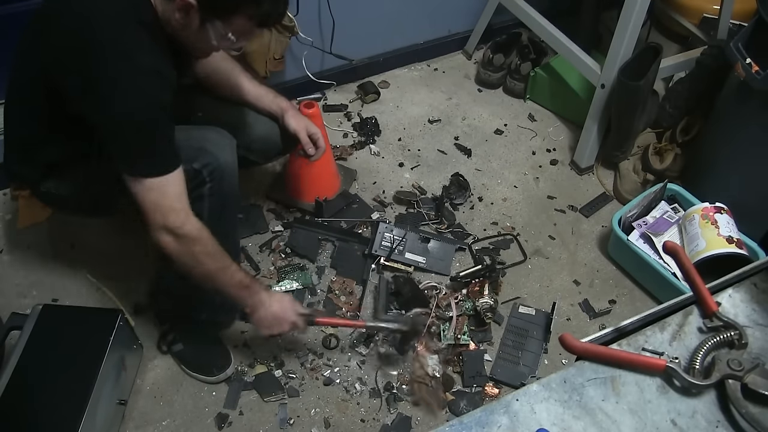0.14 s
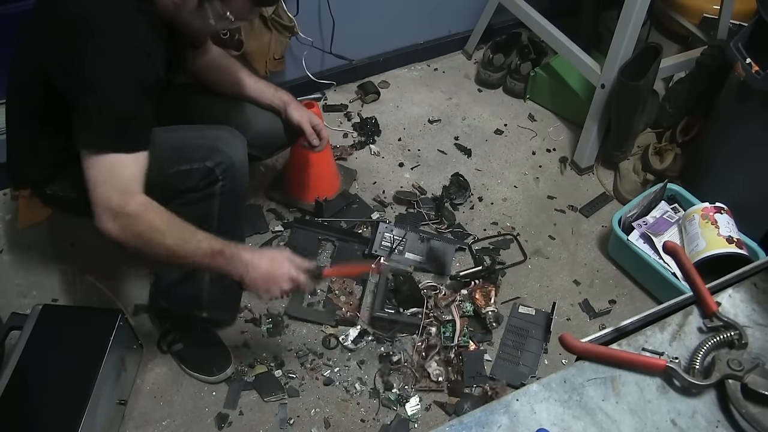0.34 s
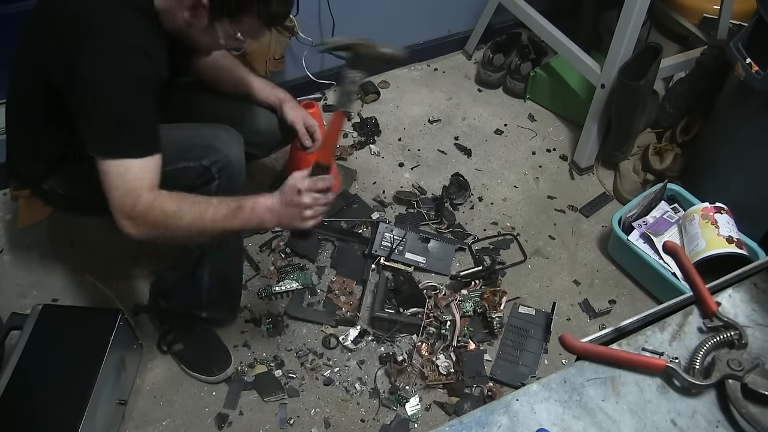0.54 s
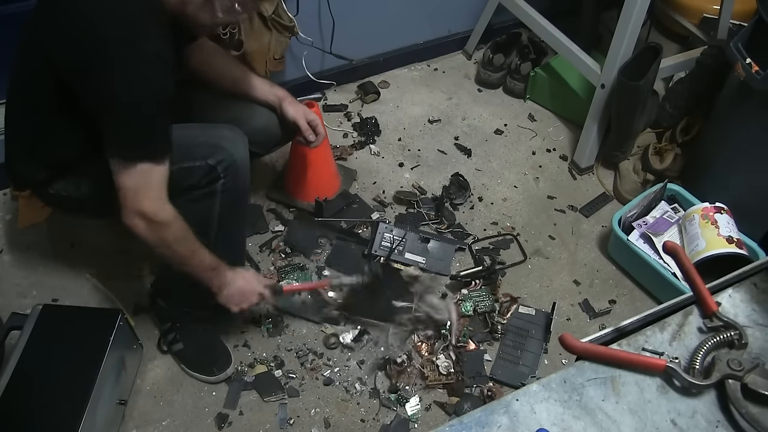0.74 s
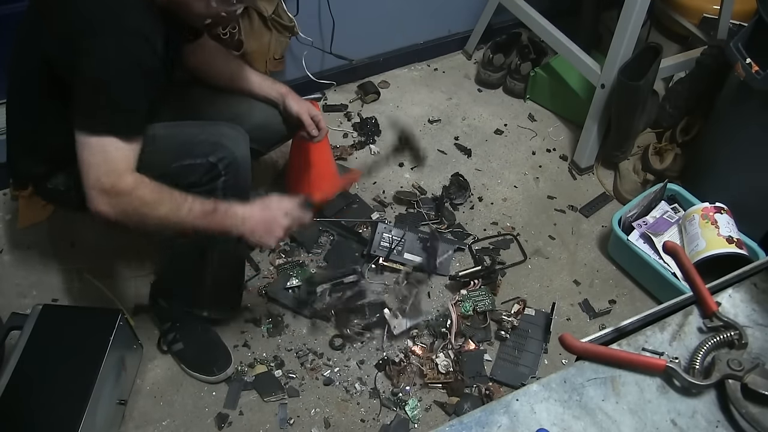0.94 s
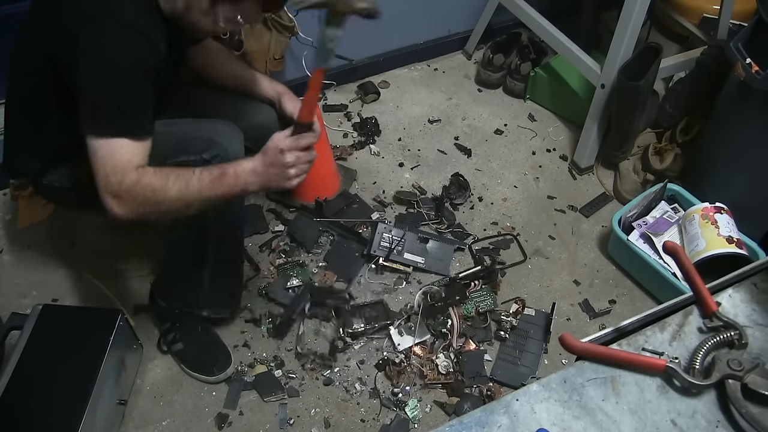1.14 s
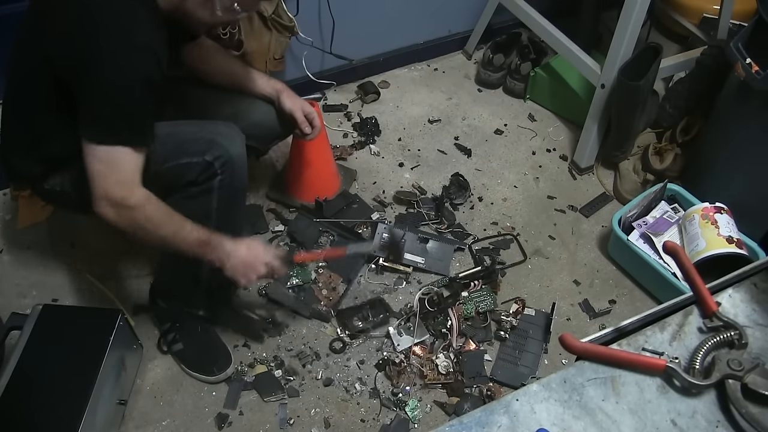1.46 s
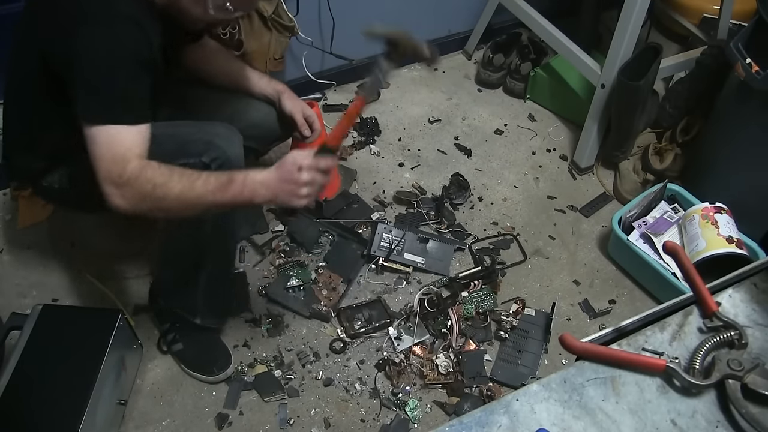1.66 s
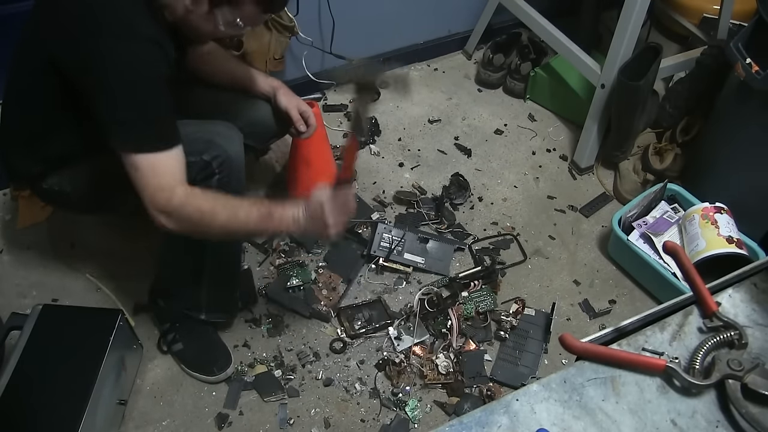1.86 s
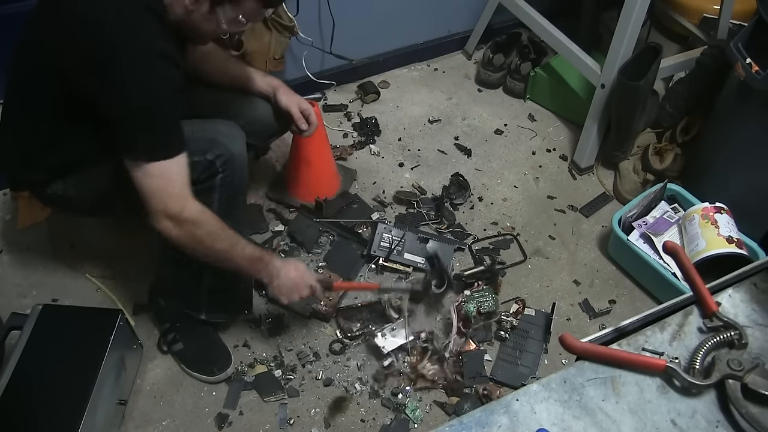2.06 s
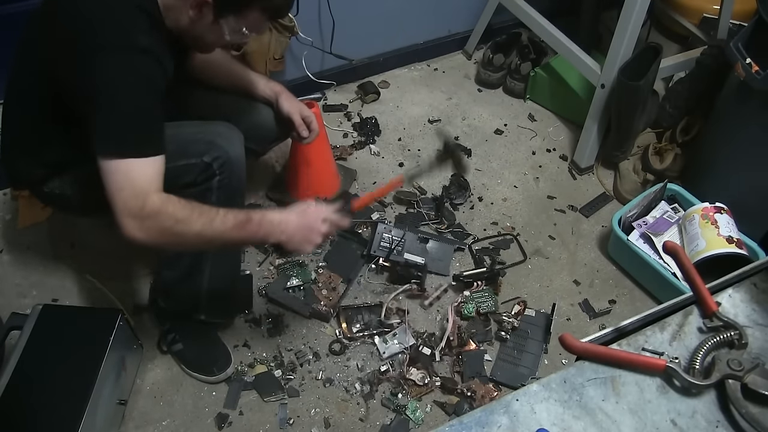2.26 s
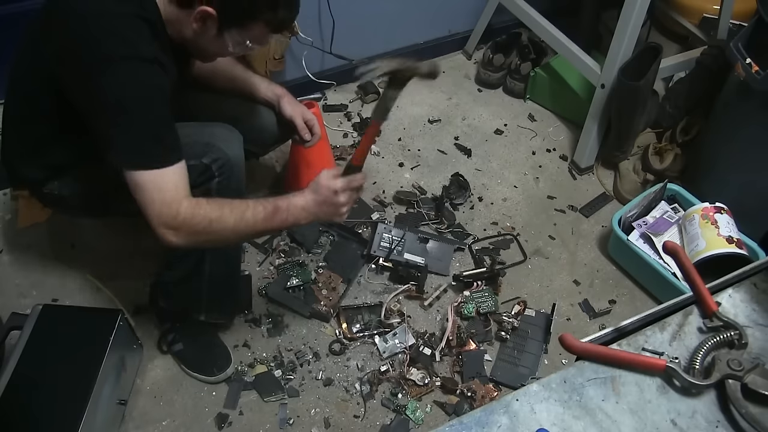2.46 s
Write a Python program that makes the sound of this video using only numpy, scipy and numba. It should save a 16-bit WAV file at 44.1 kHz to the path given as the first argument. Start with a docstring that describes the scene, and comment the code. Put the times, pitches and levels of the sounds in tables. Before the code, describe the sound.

Four sharp, cracking hammer blows on plastic debris, each scattering small rattling bits over hard floor

```python
"""Hammer on broken plastic

A hammer comes down four times on broken plastic and circuit boards on a concrete floor in a bare room.
Blows, taps and ticks are coloured noise bursts; ringing pieces are clusters of decaying sines; small bits
are short sine grains. Each passes through a noise-built room, over a quiet building hum.
The camera's gain control ducks after each blow, then lets the room's tail come back up."""
import sys
import numpy as np
from scipy import signal
from scipy.fft import rfft, irfft, next_fast_len
from scipy.io import wavfile
from numba import njit

SR = 44100
rng = np.random.default_rng(int(sys.argv[2]) if len(sys.argv) > 2 else 0)


def materialize(psi):
    """Save the field psi as 16-bit PCM at rate SR to the path in sys.argv[1].

    A 1-D psi becomes a single channel; in a 2-D psi each row is a channel.
    """
    bounded = np.clip(np.atleast_2d(psi).T, -1, 1)
    quanta = np.round(bounded * 32767).astype(np.int16)
    wavfile.write(sys.argv[1], SR, quanta)


def volts_from_decibels(level):
    """Turn decibel levels (scalar or array-like) into linear amplitude factors."""
    exponent = np.asarray(level, float) / 20
    return 10 ** exponent


N = 114660  # samples, 2.6 s
PAD = SR // 10  # samples of lead-in, for events that start before zero

# stereo width of the room and the hum: hz, side_over_mid_db [Hz, dB]
STEREO_WIDTH = [(60, -14), (180, -12.5), (550, -7), (1650, -7), (4970, -6), (15000, -6.5)]
IMPACT_DIRECT_DB = 19  # direct sound of blows and bumps over the start of the room tail
THUD_HZ, THUD_T60_S = 182, 0.045  # the floor's low thud, nominal decay
RISE_S = .0006  # onset ramp of bursts and rings


def unit(x):
    """Scales a signal to rms 1."""
    return x / np.sqrt(np.mean(x ** 2) + 1e-20)


def along(points, hz):
    """Reads a curve of (Hz, value) points on a log frequency axis."""
    f, v = np.transpose(points)
    return np.interp(np.log(hz + 1), np.log(f + 1), v)


def hump(centre_hz, width_octaves):
    """A resonant band as dB over frequency, 6 dB down one width to either side."""
    return lambda hz: -6 * (np.log2((hz + 1) / centre_hz) / width_octaves) ** 2


def filtered(x, response):
    """Multiplies the spectrum of x by a response of frequency."""
    m = next_fast_len(x.shape[-1] + 4096)
    spectrum = rfft(x, m) * response(np.fft.rfftfreq(m, 1 / SR))
    return irfft(spectrum, m)[..., :x.shape[-1]]


def burst(db_of, t60_s):
    """An impact crackle: noise of smooth colour that dies away, energy 1; t60_s is nominal."""
    t = np.arange(SR // 5) / SR
    x = rng.standard_normal(len(t))
    gain = volts_from_decibels(db_of(np.fft.rfftfreq(len(t), 1 / SR)))
    envelope = volts_from_decibels(-60 * t / t60_s) * np.minimum(t / min(RISE_S, t60_s / 10), 1)
    # alternate between the wanted envelope and the wanted spectrum, keeping only the phases
    for _ in range(4):
        shaped = np.sign(x) * np.abs(x) ** .5 * envelope
        phase = np.angle(rfft(shaped))
        x = irfft(gain * np.exp(1j * phase), len(t))
    x = x * volts_from_decibels(-6 * t / t60_s)
    return x / np.linalg.norm(x)


def in_room(x, direct_db):
    """Bare room: direct sound, a gap, then a fresh stereo noise tail from rms 1 that dies by frequency."""
    # decay of the room: hz, t60_s [Hz, s]
    room_decay = [(150, 0.57), (600, 0.6), (2000, 0.52), (5000, 0.35), (10000, 0.28), (16000, 0.24)]
    gap_s = .003  # before the first reflections
    hz, t, z = signal.stft(rng.standard_normal((2, SR * 3 // 4)), SR, nperseg=256)
    z = z * volts_from_decibels(-60 * t / along(room_decay, hz)[:, None])
    z[1] *= volts_from_decibels(along(STEREO_WIDTH, hz))[:, None]
    tail = signal.istft(z, SR, nperseg=256)[1]
    mid, side = np.pad(tail, ((0, 0), (round(gap_s * SR), 0)))
    mid[0] = volts_from_decibels(direct_db)
    return signal.fftconvolve(x[None], np.array([mid + side, mid - side]), axes=1)


def add(out, start_s, level_db, x):
    """Places a stereo sound on the padded timeline."""
    part = out[:, round(start_s * SR) + PAD:][:, :x.shape[1]]
    part += volts_from_decibels(level_db) * x[:, :part.shape[1]]


def dull_taps(out):
    """Plastic fragments land, and the first and last blows get a low knock: well-damped bursts."""
    # taps: start_s, level_db, centre_hz, width_octaves, t60_s (nominal) [s, dB, Hz, octaves, s]
    taps = [(-.06, -19.5, 9600, 0.77, 0.048), (-.05, -32.5, 1390, 1.5, 0.0067),
            (.170, -23, 377, 0.62, 0.035), (.380, -24.5, 2630, 0.58, 0.014),
            (0.445, -20.5, 9300, 1.3, 0.047), (0.442, -29.5, 3960, 0.12, .04),
            (0.4741, -19, 7900, 0.94, 0.0087), (0.5712, -22, 8300, 0.95, 0.0095),
            (.69, -42, 890, 1.2, 0.053), (.95, -17.5, 5900, 2.1, 0.058), (1.018, -21.5, 7600, 0.39, 0.031),
            (1.0452, -13, 2780, 1.46, 0.0067), (1.37, -5, 3540, 0.17, 0.012),
            (1.1108, -16.5, 8800, 0.46, 0.0167), (1.115, -17, 2460, 0.22, 0.023),
            (1.2172, -18, 5760, 3.2, 0.024), (1.547, -40, 4850, 0.81, 0.041),
            (1.6231, -14, 4800, 0.82, 0.051), (1.644, -18.5, 6600, 0.72, 0.032),
            (1.6235, -13.5, 2320, 0.5, 0.015), (1.73, -31, 670, 0.8, 0.036),
            (1.8704, -34.5, 3020, 1.2, 0.022), (1.90, -38, 3970, 1.5, 0.017),
            (1.99, -18.5, 383, 0.87, 0.035), (2.191, -21, 3880, 0.49, 0.0069),
            (2.262, -23.5, 7700, 0.75, 0.023), (2.278, -33.5, 664, 1.6, 0.0071),
            (2.35, -24, 6940, 0.77, 0.0072), (1.06, -33, 455, 0.83, 0.033), (1.20, -25, 700, 2.4, 0.014),
            (1.262, -21.5, 1730, 0.68, 0.035), (0.399, -42, 345, 0.43, 0.039), (2.42, -32, 7000, 0.72, .03)]
    for start_s, level_db, centre_hz, width, t60_s in taps:
        add(out, start_s, level_db, in_room(burst(hump(centre_hz, width), t60_s), 23.5))


def floor_bumps(out):
    """Heavier parts bump low through the floor, in the same band as the hammer's thud."""
    # low bumps: start_s, level_db [s, dB]
    bumps = [(-.05, -37), (0.471, -34.5), (1.002, -39), (1.241, -31.5), (1.322, -34), (1.6232, -28.5),
             (1.72, -36.5), (2.199, -34), (2.39, -49)]
    for start_s, level_db in bumps:
        add(out, start_s, level_db, in_room(burst(hump(THUD_HZ, 0.55), THUD_T60_S), IMPACT_DIRECT_DB))


def shower():
    """Many small bits patter down, each a sine of a few cycles at its own pitch."""
    # rise and fall of the patter: start_s, level_db (relative) [s, dB]
    patter_level = [(0, -39.5), (.16, -53), (.2, -14), (.4, -21.5), (.52, -47), (.72, -40.5), (.8, -4.5),
                    (.93, -16), (1.0, -12.5), (1.129, -16.5), (1.2, -28), (1.36, -24), (1.42, -18.5),
                    (1.602, -15.5), (1.758, -20), (1.84, -86), (1.97, -53), (2.048, -13), (2.28, -21),
                    (2.4, -74), (2.5, -53), (2.6, -99)]
    # colour of the patter ahead of its bass cut: hz, level_db (relative) [Hz, dB per Hz]
    patter_colour = [(290, -48), (500, -12), (773, -6.5), (2160, 1.5), (4150, -3), (8090, -6),
                     (12900, -18.5), (16000, -34)]
    bits_per_s, decay_cycles, spread_db, bass_cut_hz = 1500, 2.2, 3.5, 600
    count = round(bits_per_s * N / SR)
    when, pitch, size = rng.random((count, 3)).T
    hz = 600 * 25 ** pitch  # 600 to 15000 Hz, even in octaves
    t = np.arange(200) / SR
    # a few bits are much louder than the rest
    gain = volts_from_decibels(along(patter_colour, hz) + 20 * np.log10(hz) - spread_db * np.log(size + 0.024))
    cycles = hz[:, None] * t
    grains = gain[:, None] * np.sin(2 * np.pi * cycles) * np.exp(-cycles / decay_cycles)
    at = (when * N).astype(int)[:, None] + np.arange(len(t))
    bits = np.bincount(at.ravel(), grains.ravel())[:N]
    bits = unit(filtered(bits, lambda f: (f / (f + bass_cut_hz)) ** 3))
    start_s, level_db = np.transpose(patter_level)
    bits = bits * volts_from_decibels(np.interp(np.arange(N) / SR, start_s, level_db))
    # a fresh room tail for every quarter second
    step, out = SR // 4, np.zeros((2, N + 2 * SR))
    for k in range(0, N, step):
        wet = in_room(bits[k:k + step], 21)
        out[:, k:k + wet.shape[1]] += wet
    return out[:, :N] / np.sqrt(SR * 0.06)


def background():
    """The quiet hum of the building: steady noise, strongest in the bass, wider toward the treble."""
    # colour of the hum: hz, level_db (relative) [Hz, dB per Hz]
    hum_colour = [(40, -22), (90, 0), (160, 4), (300, -14), (700, -10.5), (2000, -30), (6000, -55),
                  (16000, -30)]
    mid, side = filtered(rng.standard_normal((2, N)), lambda hz: volts_from_decibels(along(hum_colour, hz)))
    side = filtered(side, lambda hz: volts_from_decibels(along(STEREO_WIDTH, hz)))
    return volts_from_decibels(-44) * unit(np.array([mid + side, mid - side]))


def hammer(out):
    """Each blow: a faint first touch, then crack, body and clatter of the casing and the floor's thud."""
    # blows: start_s, level_db, tilt_db_per_octave, thud_db, body_db, clatter_db, clatter_hz
    # [s, dB, dB per octave, dB, dB, dB, Hz]; thud, body and clatter are relative within the blow
    blows = [(0.1684, -4.5, 4, -16, -9, -24, 2170), (0.7388, 9, 0.5, -37, -21, 2, 1860),
             (1.3706, 5.5, -1, -23, -18, 2, 2110), (1.9878, -0.5, 2, -22, -9, 3.5, 1800)]
    # colour of the crack before its tilt: hz, level_db (relative) [Hz, dB per Hz]
    crack_colour = [(150, -50), (300, -12), (600, -8.5), (1000, -3.5), (1600, -2.5), (2500, -1), (4000, -3),
                    (6000, -4.5), (11000, -13), (16000, -26)]
    crack_t60_s = 0.01387  # nominal
    touch_lead_s, touch_db = 0.0012, -29  # the first touch, relative to its blow
    for start_s, level_db, tilt, thud_db, body_db, clatter_db, clatter_hz in blows:
        def colour(hz):
            """Power sum of crack, body and clatter, in dB."""
            crack = along(crack_colour, hz) + tilt * np.log2((hz + 1) / 2000)
            body = body_db + hump(810, .5)(hz)
            clatter = clatter_db + hump(clatter_hz, 0.36)(hz)
            return 10 * np.log10(volts_from_decibels(crack) ** 2 + volts_from_decibels(body) ** 2 + volts_from_decibels(clatter) ** 2)

        thud = volts_from_decibels(thud_db) * burst(hump(THUD_HZ, 0.59), THUD_T60_S)
        blow = burst(colour, crack_t60_s) + thud
        touch = burst(colour, crack_t60_s)
        add(out, start_s, level_db, in_room(blow, IMPACT_DIRECT_DB))
        add(out, start_s - touch_lead_s, level_db + touch_db, in_room(touch, IMPACT_DIRECT_DB))


def ringing_pieces(out):
    """Pieces ring at each contact with the floor: decaying modes, each a cluster of three close lines."""
    # modes, one list per piece: pitch_hz, level_db (relative) [Hz, dB]
    piece_modes = [
        [(4054, -37.5), (5440, -42), (5631, -30), (5911, -69), (6665, -29), (8193, -28), (10691, -46),
         (12721, -53)],
        [(3095, -46), (4005, -49), (4705, -46), (5561, -48), (6250, -48), (6864, -53), (7682, -39), (9179, -38),
         (9550, -45), (10368, -43)],
        [(3720, -34), (4323, -34.5), (4893, -36.5), (5798, -37), (7203, -43), (7553, -40.5), (8016, -37.5),
         (8183, -44), (10605, -41.5), (11563, -41.5)],
        [(457.6, -37.5), (565.2, -31), (791.3, -36)],
        [(1814, -33.5), (2326, -29), (3278, -39), (4237, -35.5), (5443, -39), (6751, -41)],
        [(3190, -49), (3295, -26.5), (3520, -28), (4091, -37), (4705, -41), (4872, -36), (6132, -37.5),
         (9400, -33.5)],
    ]
    # decay of each piece: t60_s [s]
    piece_t60 = [.045, .04, .035, .1, .07, .045]
    # floor contacts, one list per piece: start_s, level_db [s, dB]
    piece_contacts = [
        [(.4749, -18), (.496, -48)],
        [(0.5725, -25)],
        [(1.214, -22), (1.232, -15), (1.255, -44), (1.270, -24.5)],
        [(1.245, -23.5), (1.29, -28.5), (1.315, -25.5)],
        [(1.6233, -10.5), (1.76, -46), (1.872, -35)],
        [(2.200, -17), (2.230, -18.5), (2.33, -23.5), (2.365, -34.5), (2.40, -54), (2.43, -54)],
    ]
    split = .016  # spacing of a cluster's lines, as a share of the pitch
    t = np.arange(SR // 4) / SR
    for modes, t60_s, contacts in zip(piece_modes, piece_t60, piece_contacts):
        envelope = volts_from_decibels(-60 * t / t60_s) * np.minimum(t / RISE_S, 1)
        for start_s, level_db in contacts:
            ring = np.zeros(len(t))
            for pitch_hz, mode_db in modes:
                for k in (-1, 0, 1):
                    line_hz = pitch_hz * (1 + split * (k + rng.normal(0, 0.19)))
                    gain = volts_from_decibels(mode_db + rng.normal(0, 1.3)) * (.5 if k else 1)
                    ring += gain * np.sin(2 * np.pi * line_hz * t + rng.uniform(0, 2 * np.pi))
            ring *= envelope
            add(out, start_s, level_db, in_room(ring / np.linalg.norm(ring), 25.5))


def close_ticks(out):
    """Sharp ticks close to the camera: very short bursts, mostly direct sound with little room."""
    # ticks: start_s, level_db, centre_hz, width_octaves [s, dB, Hz, octaves]
    ticks = [(0.983, -23.5, 2430, 0.53), (.992, -30, 2500, 0.65), (1.0162, -25, 2400, .7),
             (1.090, -33, 2940, 1), (1.247, -31, 3920, 0.63), (1.604, -41, 2960, 0.92),
             (2.194, -34, 3770, 0.34), (2.288, -36, 4000, 0.6), (2.3942, -29.5, 6300, 0.29),
             (2.394, -36, 11200, 0.18), (2.403, -37, 6100, 0.23)]
    for start_s, level_db, centre_hz, width in ticks:
        add(out, start_s, level_db, in_room(burst(hump(centre_hz, width), .003), 34))


def scene():
    """All impacts and fragments, slightly to the left, over the hum."""
    events = np.zeros((2, N + PAD))
    for source in (dull_taps, floor_bumps, hammer, ringing_pieces, close_ticks):
        source(events)
    left_db = 0.46  # left up and right down by this much
    return (events[:, PAD:] + shower()) * volts_from_decibels([[left_db], [-left_db]]) + background()


@njit
def follow(wanted, fall, rise):
    """Smooths a gain toward the wanted value, down at one speed and up at another."""
    out, now = np.zeros(len(wanted)), 0.0
    for k in range(len(wanted)):
        now += (fall if wanted[k] < now else rise) * (wanted[k] - now)
        out[k] = now
    return out


def gain_control(x):
    """The camera's gain control: pulls levels above the hold level down to it, fast down and slow up."""
    hold_db, attack_s, release_s, sense_s = -11, 0.004, 0.085, 0.0013
    keep = np.exp(-1 / (sense_s * SR))
    power = signal.lfilter([1 - keep], [1, -keep], np.mean(x ** 2, axis=0))
    level_db = 10 * np.log10(power + 1e-12)
    wanted_db = np.minimum(hold_db - level_db, 0)
    return x * volts_from_decibels(follow(wanted_db, 1 / (attack_s * SR), 1 / (release_s * SR)))


def circuit_rumble(shape):
    """The circuit's own rumble: low-passed noise, independent in each channel."""
    noise = rng.standard_normal(shape)
    return volts_from_decibels(-66) * unit(filtered(noise, lambda hz: 1 / (1 + (hz / 70) ** 2)))


def top_cut(x):
    """Nothing passes above the cut-off."""
    return signal.sosfilt(signal.butter(12, 16340, fs=SR, output="sos"), x)


def record(dry):
    """Bass and top cut, gain control, clipping, a coupling high-pass, then the circuit's rumble."""
    bass_cut_hz, top_hz, coupling_hz = 127, 16300, 60
    x = filtered(dry, lambda hz: (1j * hz / (bass_cut_hz + 1j * hz)) ** 3 * (hz < top_hz))
    clipped = np.clip(gain_control(x), -1, 1)
    coupled = filtered(clipped, lambda hz: (1j * hz / (coupling_hz + 1j * hz)) ** 2)
    return top_cut(np.clip(coupled + circuit_rumble(x.shape), -1, 1))


dry = scene()
out = record(dry)
materialize(out)
```